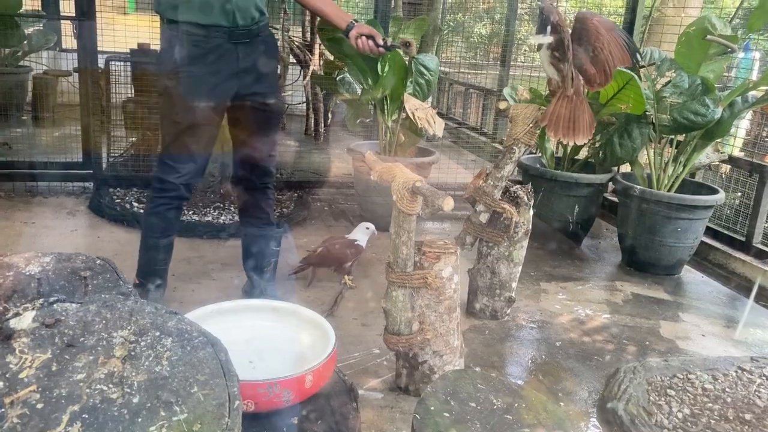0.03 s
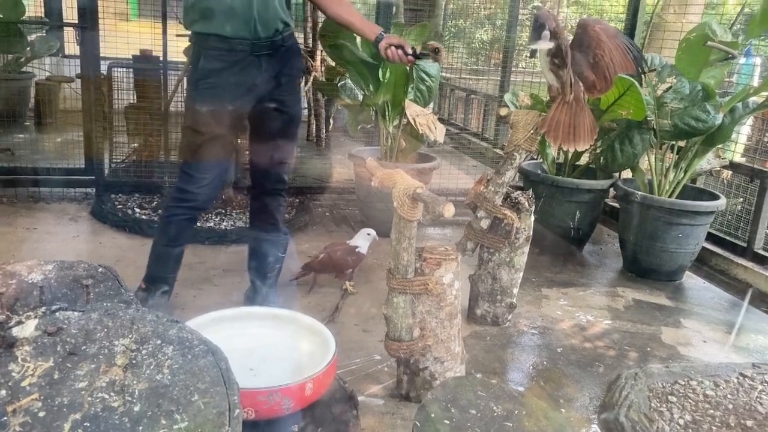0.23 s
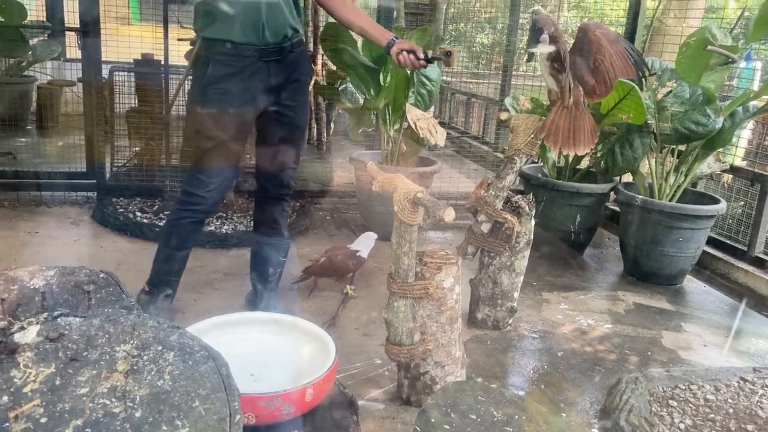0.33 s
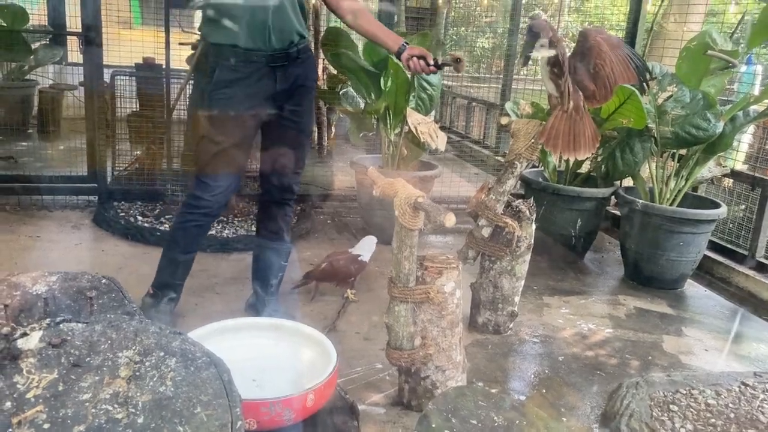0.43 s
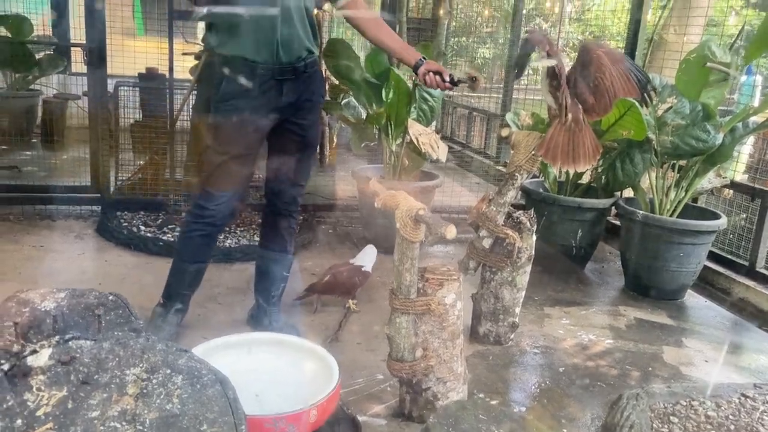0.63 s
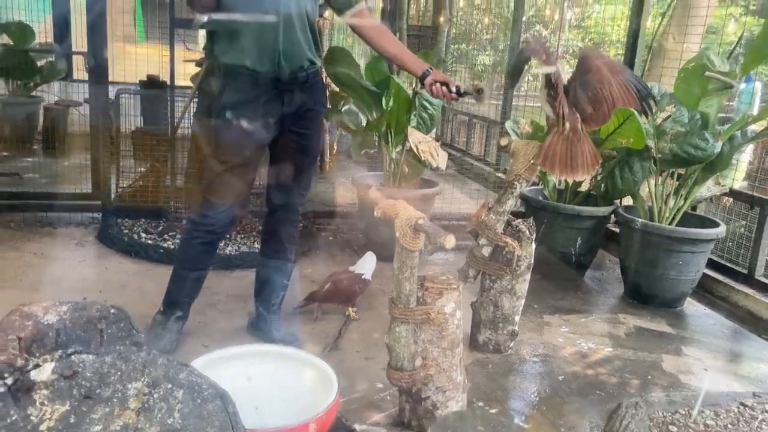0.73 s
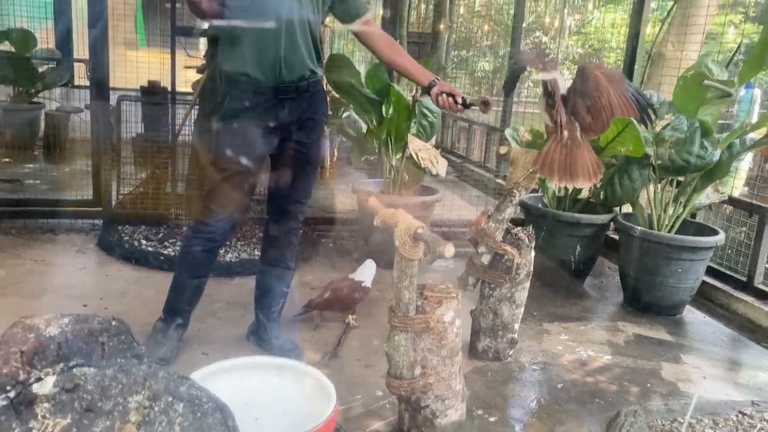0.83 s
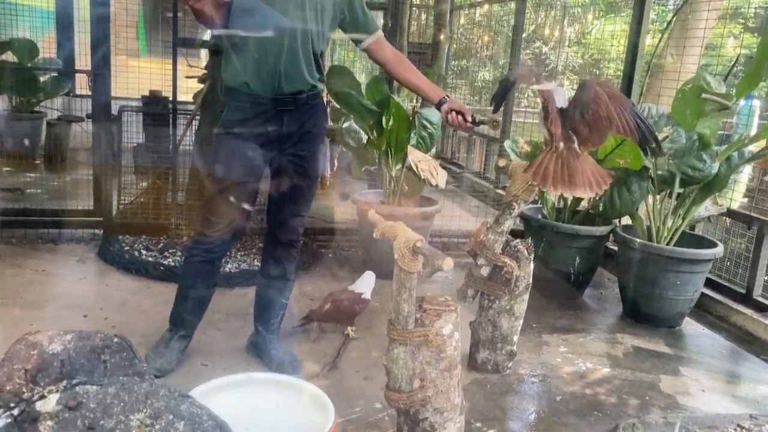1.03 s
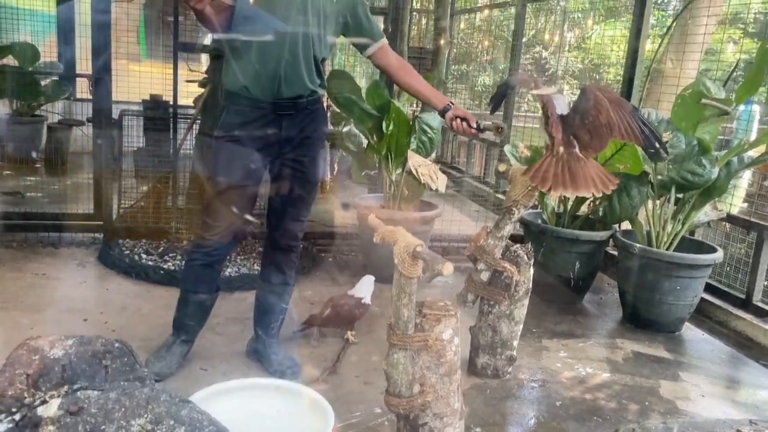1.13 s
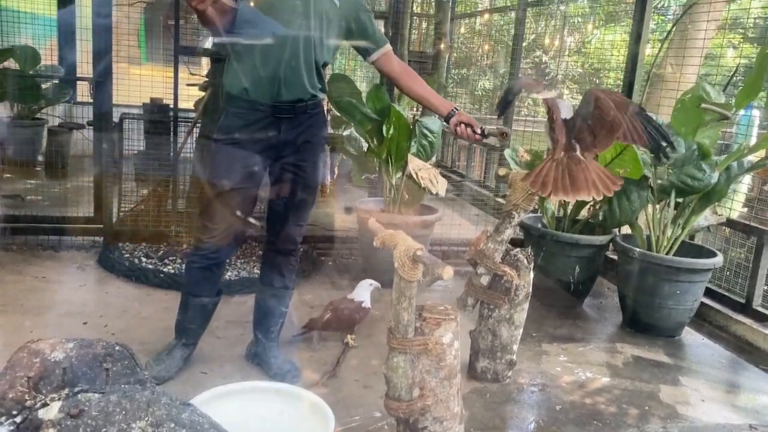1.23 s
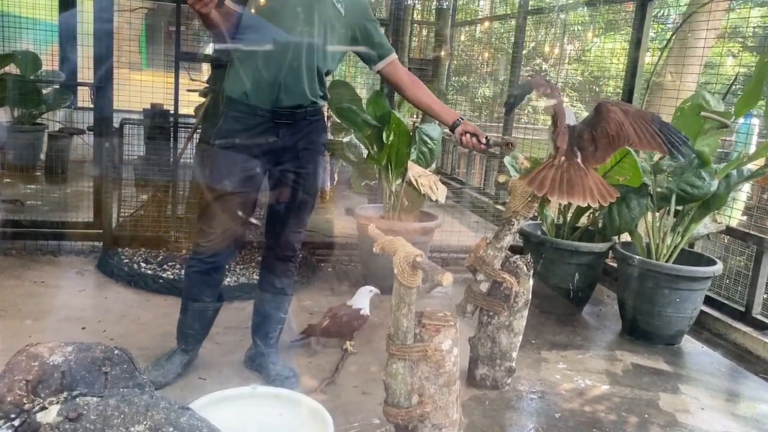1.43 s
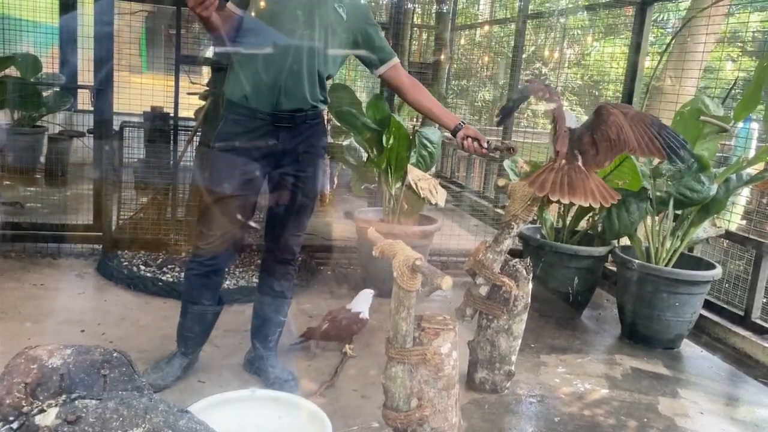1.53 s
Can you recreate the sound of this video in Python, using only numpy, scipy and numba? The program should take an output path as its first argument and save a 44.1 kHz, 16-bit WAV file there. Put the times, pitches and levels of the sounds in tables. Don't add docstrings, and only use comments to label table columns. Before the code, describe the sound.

One raptor mew starts reedy and rising, breaks into a loud clear whistle, then sags and fades with echoes in a hard-walled aviary; low engine hum, water hiss and wing rustle behind, overloaded phone microphone.

```python
import sys
import numpy as np
from scipy import signal
from scipy.io import wavfile
from scipy.ndimage import uniform_filter1d
from numba import njit

SR = 44100
rng = np.random.default_rng(int(sys.argv[2]) if len(sys.argv) > 2 else 0)


def magnitude_from_level(level_db):
    exponent = np.asarray(level_db, float) / 20
    return 10 ** exponent


def to_wav(s):
    ch = np.atleast_2d(s).T
    pcm = np.round(np.clip(ch, -1, 1) * 32767)
    wavfile.write(sys.argv[1], SR, pcm.astype(np.int16))


N = 70560


def level(x, db):
    return x * magnitude_from_level(db) / np.sqrt(np.mean(x ** 2))


def curve(table, col):
    rows = np.array(table, float)
    return np.interp(np.arange(N) / SR, rows[:, 0], rows[:, col])


def band(x, hz, width_hz):
    b, a = signal.iirpeak(min(hz, 0.45 * SR), hz / width_hz, fs=SR)
    return signal.lfilter(b, a, x)


def band_twice(x, hz, width_hz, second_width_hz):
    return band(band(x, hz, width_hz), hz, second_width_hz)


def noise():
    return rng.standard_normal(N)


def walk(rate_hz):
    hold = int(SR / rate_hz)
    held = rng.standard_normal(2000)[np.arange(N) // hold]
    return 1.59 * uniform_filter1d(uniform_filter1d(held, hold), hold)


def yard():
    # f/Hz, level/dB per Hz
    yard_spectrum = [(35, -0.5), (90, -27), (250, -7.5), (600, -15), (2300, -10), (4000, -31), (8000, -39),
                     (15000, -76)]
    rows = np.array(yard_spectrum)
    swell = walk(0.67)
    out = 0
    for hz in 40 * 2 ** np.arange(0, 8.6, 0.5):
        db = np.interp(np.log(hz), np.log(rows[:, 0]), rows[:, 1])
        db = db + 0.27 * swell + 0.4 * walk(6.2)
        width_hz = hz / 2.03
        out = out + magnitude_from_level(db) * band_twice(noise(), hz, width_hz, width_hz)
    return level(out, -26)


def engine():
    # t/s, rate/Hz (engine cycles), level/dB
    idle = [
        (0, 21.3, -18),
        (.15, 21.9, -19),
        (.28, 21, -24.5),
        (.36, 18.9, -16.5),
        (.5, 19.3, -21),
        (.65, 19.68, -24),
        (1.6, 19.68, -24),
    ]
    # f/Hz, width/Hz, level/dB
    exhaust = [(56.2, 25, 2), (79.1, 7.6, -2), (96.8, 15.2, 7), (118.7, 6.1, -5.5), (157.7, 13, -3.5),
               (214.4, 7.6, -14), (300, 130, -3), (349.8, 11.9, -10.5)]
    firing_at_s, scatter_db = 1.157, 0.5
    rate_hz = np.pad(curve(idle, 1), (0, SR // 5), mode="edge")
    turns = np.cumsum(rate_hz) / SR
    turns = turns - turns[int(firing_at_s * SR)]
    firings = np.flatnonzero(np.diff(np.floor(turns)))
    pulses = np.zeros(len(turns))
    pulses[firings] = magnitude_from_level(scatter_db * rng.standard_normal(60)[:len(firings)])
    pipe = 0
    for hz, width_hz, db in exhaust:
        ring = band_twice(pulses[::-1], hz, width_hz, width_hz)[::-1]
        pipe = pipe + magnitude_from_level(db) * ring / width_hz
    return level(pipe[:N], 0) * magnitude_from_level(curve(idle, 2))


def spray():
    from_s, rise_s = 0.1, 0.1
    centre_hz, width_hz = 4000, 4270
    rise = np.clip((np.arange(N) / SR - from_s) / rise_s, 0, 1)
    hiss = band_twice(noise(), centre_hz, width_hz, 2 * width_hz)
    return level(hiss, -34) * rise * magnitude_from_level(0.5 * walk(20))


def rustle():
    # t/s, level/dB
    stir = [
        (0, -50.5),
        (.13, -53),
        (.165, -40.5),
        (.22, -34),
        (.3, -42),
        (.4, -40),
        (.55, -39),
        (.9, -75),
        (1.6, -54),
    ]
    hiss = level(band(noise(), 8850, 9500), 0)
    return hiss * magnitude_from_level(curve(stir, 1) + 1.2 * walk(26.7))


def thud():
    at_s, mode_hz, width_hz = 0.6, 226, 25
    tap = 1.0 * (np.arange(N) == int(at_s * SR))
    ring = band_twice(tap, mode_hz, width_hz, 2 * width_hz)
    return magnitude_from_level(-19.5) * ring / ring.max()


@njit
def walls(x, lags, gain, damp):
    line, soft, out = np.zeros((8, 4096)), np.zeros(8), np.zeros(len(x))
    for i in range(len(x)):
        total = 0.
        for k in range(8):
            echo = gain[k] * line[k, (i - lags[k]) & 4095]
            soft[k] += (1 - damp) * (echo - soft[k])
            total += soft[k]
            out[i] += soft[k] * (1 - 2 * (k % 2))
        for k in range(8):
            line[k, i & 4095] = x[i] + soft[k] - total / 4
    return out


def aviary(bird):
    # t/s, level/dB
    to_walls = [
        (.2, -0.5),
        (.58, 5.5),
        (.64, -13.5),
        (.8, -6),
        (.87, 4.5),
        (.96, 10),
    ]
    t60_s, damp = 1.0, 0.1
    lags = np.array([521, 787, 1109, 1481, 1873, 2293, 2741, 3203])
    sent = band(bird * magnitude_from_level(curve(to_walls, 1)), 1656, 1440)
    gain = magnitude_from_level(-60 * lags / SR / t60_s)
    return magnitude_from_level(-18) * walls(sent + 1e-18, lags, gain, damp)


def syrinx(part, column, pitch_hz, waver_db):
    # harmonic number, level/dB reedy, level/dB whistle
    harmonics = [(1, -12.5, -14), (2, -9.5, 0.5), (3, -4, -25.5), (4, -3.5, -31.5), (5, -7.5, -23.5),
                 (6, -14.5, -32), (7, -11.5, -30.5), (8, -14, -38), (9, -14.5, -44), (10, -15, -46),
                 (11, -17.5, -46), (12, -15, -50), (13, -34, -68)]
    attack_s, release_s = 0.0022, 0.005
    throat_boost_db, throat_width_hz = 7.5, 370
    t = np.arange(N) / SR
    phase = 2 * np.pi * np.cumsum(pitch_hz) / SR
    beak_hz, throat_hz = curve(part, 2), curve(part, 4)
    rough = np.clip(curve(part, 3), 0, 1)
    onset = np.clip((t - part[0][0]) / attack_s, 0, 1)
    gate = onset * np.clip((part[-1][0] - t) / release_s + 1, 0, 1)
    slip = 0.8 * rough ** 2 * walk(200)
    tone = 0
    for row in harmonics:
        number = row[0]
        beak = 1 / np.sqrt(1 + (number * pitch_hz / beak_hz) ** 24)
        off_throat = (number * pitch_hz - throat_hz) / throat_width_hz
        throat_db = throat_boost_db * np.exp(-off_throat ** 2)
        flutter_db = min(number, 3) / 3 * waver_db * walk(60)
        gain = beak * magnitude_from_level(row[column] + throat_db + flutter_db)
        gain = gain * (1 + rough * walk(250))
        tone = tone + gain * np.sin(number * (phase + slip) + number ** 2)
    breath = magnitude_from_level(-2) * rough * level(band(noise(), 1720, 2060), 0)
    return (np.sqrt(2) * tone + breath) * gate * magnitude_from_level(curve(part, 1))


def cry():
    # t/s, level/dB, beak cut-off f/Hz, roughness (0-1), throat resonance f/Hz
    reed = [
        (.224, -22.5, 2240, 0.2, 2020),
        (.265, -18.5, 2370, 0.18, 2130),
        (.29, -16, 3100, 0.2, 2900),
        (.345, -15, 5200, 0.21, 2800),
        (.43, -14.5, 6360, 0.25, 2850),
        (0.499, -14.5, 7300, 0.19, 2400),
        (.55, -15, 6100, 0.29, 2250),
        (0.601, -19.5, 4960, 0.64, 2380),
        (.635, -22, 4000, 0.66, 2440),
    ]
    whistle = [
        (.37, -24, 4000, 0, 2900),
        (.44, -11.5, 4000, 0.03, 2900),
        (.54, -20.5, 4000, 0.14, 2870),
        (.63, 3, 4000, 0.08, 2720),
        (.72, 3.5, 4000, 0.05, 2690),
        (.785, 5, 4000, 0, 3020),
        (.86, -1.5, 4000, 0.06, 2750),
        (.92, -11.5, 4000, 0.2, 2860),
        (.978, -19, 4000, 0.31, 2760),
    ]
    # t/s, f/Hz
    pitch = [
        (.224, 516),
        (.3, 560),
        (.37, 580),
        (.49, 587),
        (.555, 605),
        (.635, 653),
        (.7, 666),
        (.775, 659),
        (.9, 596),
        (.98, 530),
    ]
    # t/s, half length/s, depth/dB
    dips = [
        (0.816, .002, -20),
        (0.87, 0.0019, -8.5),
    ]
    waver_db, jitter = 2.6, 0.0016
    pitch_hz = uniform_filter1d(curve(pitch, 1), size=2400) * (1 + jitter * walk(59.5))
    t = np.arange(N) / SR
    dip_db = 0
    for at_s, half_s, depth_db in dips:
        dip_db = dip_db + depth_db * np.exp(-((t - at_s) / half_s) ** 2)
    reedy = syrinx(reed, 1, pitch_hz, waver_db)
    return reedy + magnitude_from_level(dip_db) * syrinx(whistle, 2, pitch_hz, waver_db / 6)


def scene():
    bird = cry()
    background = yard() + engine() + spray() + rustle() + thud()
    return (background + aviary(bird) + bird)[None]


def top_cut(x):
    return signal.sosfilt(signal.butter(12, 15460, fs=SR, output="sos"), x)


def record(dry):
    ceiling, knee, top_hz = 0.735, 8.0, 15450
    flat = dry / (1 + np.abs(dry / ceiling) ** knee) ** (1 / knee)
    low_pass = signal.ellip(8, 0.2, 70, top_hz, fs=SR, output="sos")
    return top_cut(signal.sosfilt(low_pass, flat))


dry = scene()
out = record(dry)
to_wav(out)
```